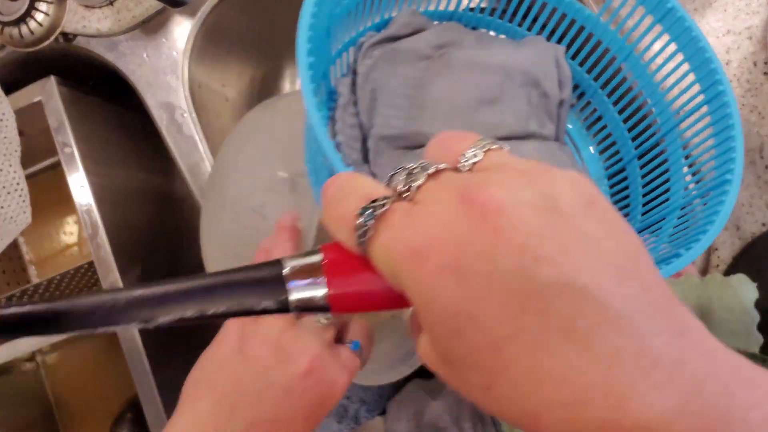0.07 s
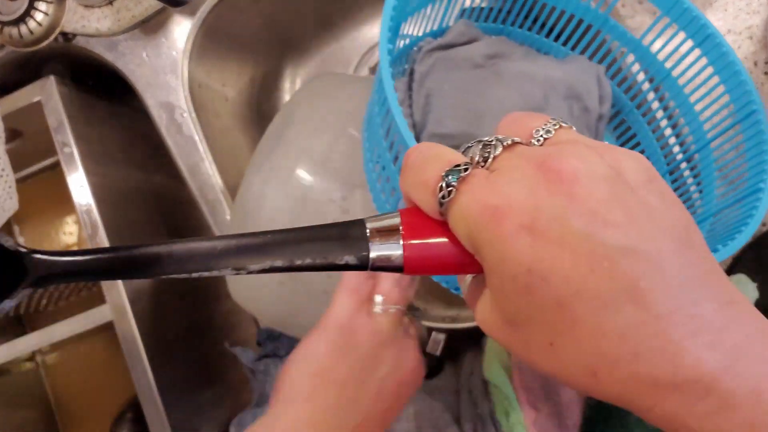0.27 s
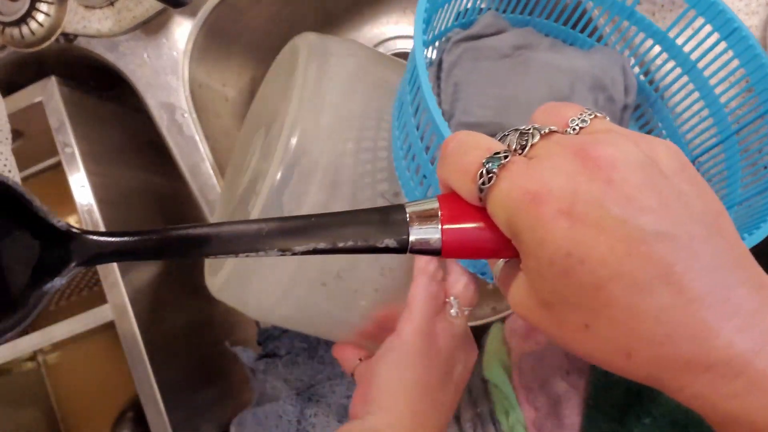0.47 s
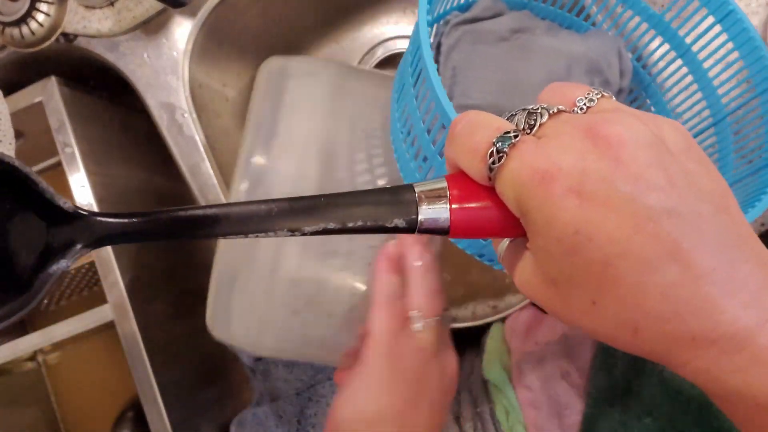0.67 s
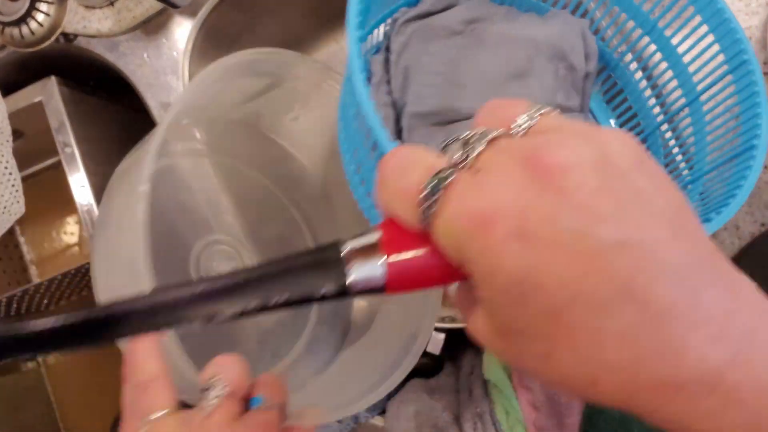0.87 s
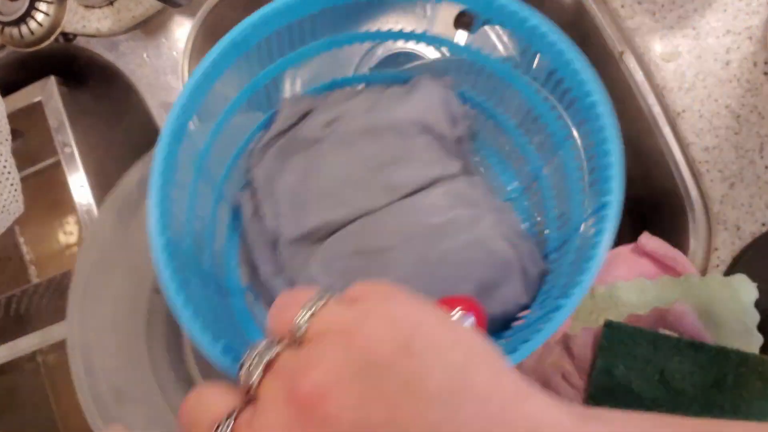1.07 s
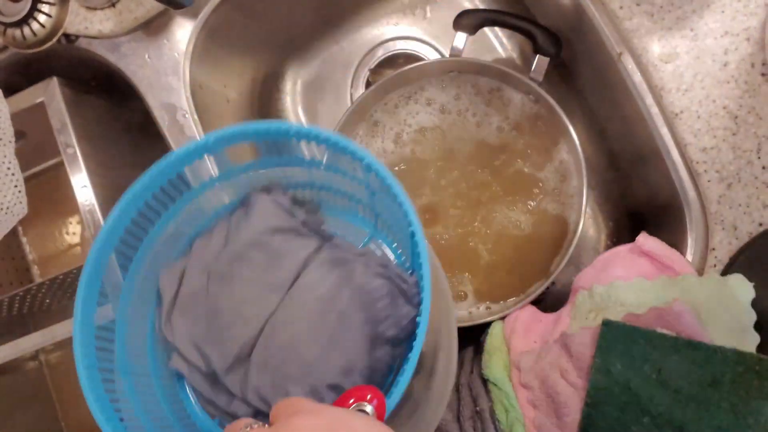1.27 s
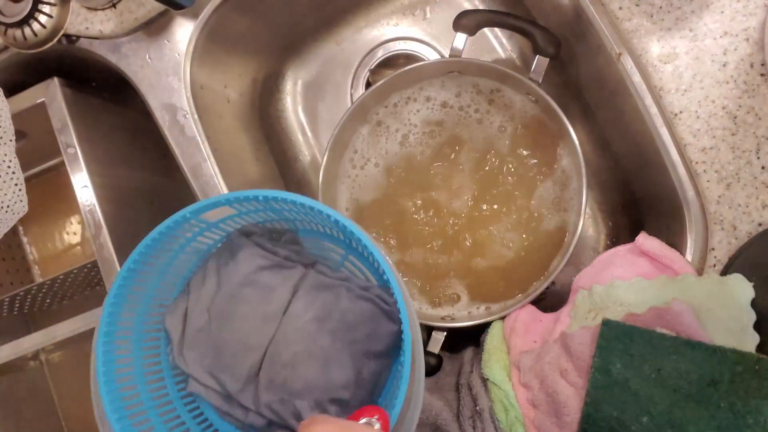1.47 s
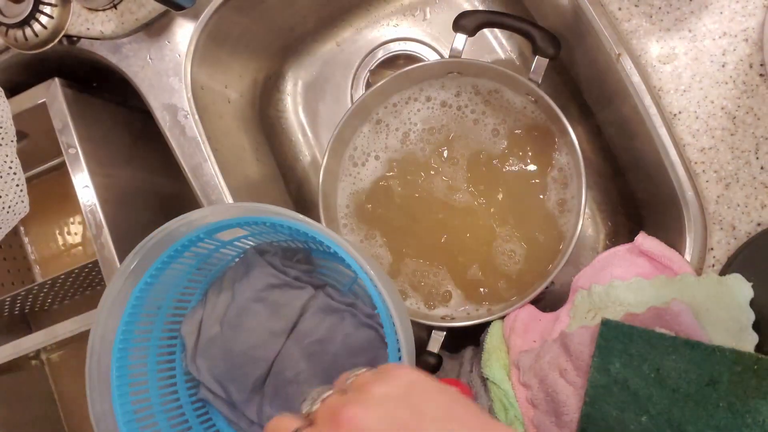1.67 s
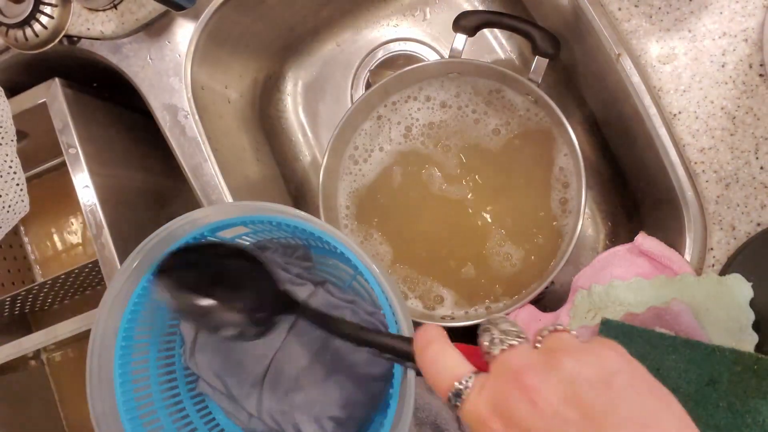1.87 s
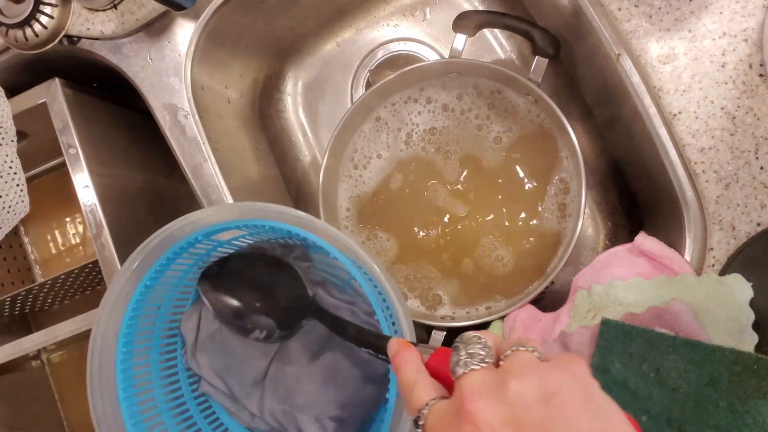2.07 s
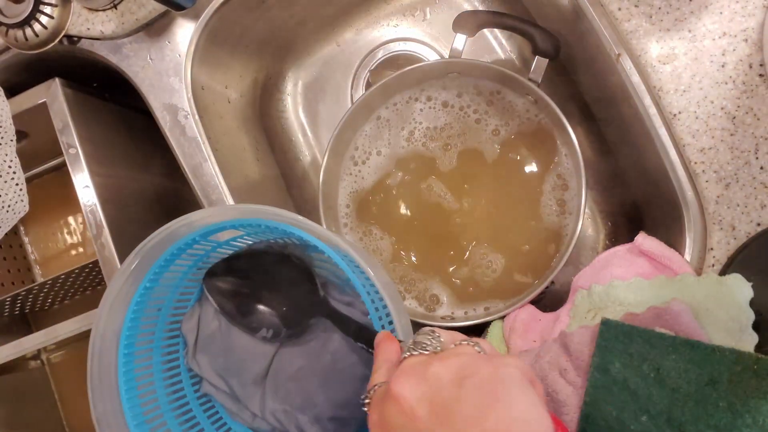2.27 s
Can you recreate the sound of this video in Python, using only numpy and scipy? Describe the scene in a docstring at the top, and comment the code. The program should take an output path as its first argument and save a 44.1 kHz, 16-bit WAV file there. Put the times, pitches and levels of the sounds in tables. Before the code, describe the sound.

Plastic basket knocks loudly into a plastic bowl in a steel sink, with wet scrapes and drips

```python
"""In a kitchen, a slotted plastic basket is lowered into a plastic bowl that stands in a steel sink.
Bowl and sink boom under each knock as sums of dying modes; rims click as noise bursts with short rings.
A few drops plop as gliding sines, a ladle taps, and wet rubbing scrapes, hisses and gurgles as shaped noise;
late on, the ladle presses wool. Echo tails and a low rumble surround it all.
A close pair of microphones clips on the loudest knocks."""
import sys
import numpy as np
from scipy import signal
from scipy.fft import rfft, irfft
from scipy.io import wavfile

SR = 44100
rng = np.random.default_rng(int(sys.argv[2]) if len(sys.argv) > 2 else 0)


def master(y):
    """Save y as 16-bit WAV."""
    cut = np.clip(np.atleast_2d(y).T, -1, 1)
    pcm = np.round(cut * 32767)  # scale
    wavfile.write(sys.argv[1], SR, pcm.astype(np.int16))


def boost_factor(decibels):
    """Convert a level in decibels to a linear amplitude factor."""
    exponent = np.asarray(decibels, float) / 20
    return 10 ** exponent


N = 101738  # samples in the scene

# Modes of the steel sink. Each row: frequency in Hz, level in dB, decay time t60 in seconds.
SINK_MODES = [(80.8, -12.5, 0.3), (108.02, -2, 0.61), (116.1, -3, 0.89), (156.6, 2, 0.32), (206.3, 2, 0.1)]
# Modes of the plastic bowl. Each row: frequency in Hz, level in dB, decay time t60 in seconds.
BOWL_MODES = [(230.94, -5.5, 0.39), (250, -8, 0.21), (297, -2.5, 0.11), (342, -22, 0.081),
              (376.7, -4, 0.21), (404.2, -1, 0.17), (504, -0.5, 0.15), (536.6, 1.5, 0.19), (591, -10, 0.17),
              (668, -12, .12)]
BOOM_PAN_DB, RUB_PAN_DB = -2, -4  # left over right, dB


def evened(x):
    """Normalisation: scales a signal to an rms of 1."""
    return x / np.sqrt(np.mean(x ** 2) + 1e-20)


def add(mix, s, sound):
    """Superposition: sums a sound into the mix from s seconds on."""
    part = mix[..., round(s * SR):][..., :sound.shape[-1]]
    part += sound[..., :part.shape[-1]]


def colour(x, points):
    """Spectral shaping: weights a signal's spectrum by a table of Hz and dB, then sets rms to 1."""
    f, db = np.transpose(points)
    hz = np.fft.rfftfreq(x.shape[-1], 1 / SR)
    gain = boost_factor(np.interp(np.log(hz + 1), np.log(f + 1), db, -90, -90))
    return evened(irfft(rfft(x) * gain, x.shape[-1]))


def filtered(x, kind, hz, order=2):
    """Butterworth filtering: a maximally flat pass band beyond or below a corner frequency."""
    return signal.sosfilt(signal.butter(order, hz, kind, fs=SR, output="sos"), x)


def pan(x, db):
    """Level panning: makes the left louder than the right by db."""
    return x * boost_factor(np.array([[db / 2], [-db / 2]]))


def pair(same, length=N):
    """Partial coherence: two white noises whose correlation is same."""
    a, b = rng.standard_normal((2, length))
    return np.array([a, same * a + np.sqrt(1 - same ** 2) * b])


def curves(table):
    """Envelopes: interpolates dB columns over time and turns them into gains."""
    s, *level = np.transpose(table)
    return [boost_factor(np.interp(np.arange(N) / SR, s, db)) for db in level]


def ring(modes, spot, favour_hz=None, damping=1, length_s=.5):
    """Modal synthesis: one object's dying sines, weighted by the struck spot, scaled to a peak of 1."""
    hz, db, t60 = np.transpose(modes)[:, :, None]
    t = np.arange(round(length_s * SR)) / SR
    if favour_hz:
        db = db - 12 * abs(np.log2(hz / favour_hz))  # dB lost per octave off the favoured pitch
    spot_db = 2.5 * spot[:len(modes), None]
    decay = boost_factor(db + spot_db - 60 * t * damping / t60)
    out = (decay * np.sin(2 * np.pi * hz * t)).sum(0)
    return out / abs(out).max()


def room_air():
    """Stationary background: steady coloured noise for the kitchen air, nearly mono low noise for rumble."""
    # Kitchen air. Each row: frequency in Hz, relative spectral density in dB.
    air_spectrum = [(200, -30.5), (400, -3), (600, 2), (1000, -24.5), (3000, -22), (8000, -25),
                    (15000, -25.5), (16500, -52)]
    # Low room rumble. Each row: frequency in Hz, relative spectral density in dB.
    rumble_spectrum = [(12, -44), (20, -20.5), (43, 5.5), (75, -3.5), (102, -7), (193, -8.5), (300, -11),
                       (390, -35.5), (660, -120)]
    air = boost_factor(-67.5) * colour(pair(.2), air_spectrum)
    rumble = boost_factor(-55) * colour(pair(.85), rumble_spectrum)
    return air + rumble


def gurgles():
    """Bubble resonance: many short decaying sines of rising pitch, scattered in pitch, time and side."""
    per_s, cycles, pitches = 180, 5.0, 14  # bubbles per second over all pitches; length of each in cycles
    out = np.zeros((2, N))
    for hz in np.geomspace(420, 4000, num=pitches):
        u = np.arange(0, 3 * cycles, hz / SR)  # time counted in cycles
        envelope = np.minimum(u, 1) * np.exp(-2 * u / cycles)
        blip = envelope * np.sin(2 * np.pi * u * (1 + 0.0056 * u))
        starts = rng.random(N) < per_s / pitches / SR
        strength = boost_factor(3.0 * np.minimum(rng.exponential(1, N), 3))
        out += pan(signal.oaconvolve(starts * strength, blip)[:N], rng.uniform(-13, 18))
    return evened(out)


def rubbing():
    """Wet friction: grains of noise scrape, hiss and gurgle; forced vibration keeps bowl and sink humming."""
    # Handling hum. Each row: time in seconds, level of the sink in dB, level of the bowl in dB.
    hum_levels = [(0.0, -24.5, -40), (0.31, -51, -45), (0.44, -39, -41.5), (0.54, -48.5, -53.5),
                  (0.72, -50, -48), (0.79, -34, -38), (0.92, -29.5, -48), (1.11, -40.5, -65.5),
                  (1.22, -38, -37), (1.35, -18, -36), (1.42, -20.5, -21), (1.51, -41.5, -31.5),
                  (1.63, -26.5, -30.5), (1.91, -39, -50.5), (2.16, -57, -57.5), (2.3, -70, -60.5)]
    # Wet rubbing and trickling. Each row: time in seconds, scrape level in dB, hiss level in dB.
    rub_levels = [(0, -48, -43.5), (.03, -49, -50.5), (.09, -53, -54), (.145, -60.5, -67),
                  (.16, -43.5, -53), (.21, -51, -62), (.275, -59.5, -63), (.29, -45, -64),
                  (.34, -45.5, -47), (.42, -45.5, -58), (.45, -35.5, -44), (.5, -46, -51),
                  (.57, -48.5, -49.5), (.63, -50.5, -56), (.66, -42.5, -49.5), (.74, -43.5, -51),
                  (.755, -35, -47), (.775, -33.5, -44), (.805, -44, -52), (.82, -46, -53),
                  (.86, -50.5, -67), (.95, -65, -65), (1.09, -65, -62), (1.115, -47, -61), (1.16, -53, -56),
                  (1.205, -40.5, -53.5), (1.3, -41, -40), (1.42, -39, -42.5), (1.47, -44.5, -54.5),
                  (1.54, -48, -56.5), (1.585, -32, -47), (1.62, -43.5, -51), (1.67, -44.5, -51.5),
                  (1.74, -46, -50), (1.82, -45.5, -60.5), (1.87, -55, -66.5), (2.0, -53.5, -68),
                  (2.12, -56.5, -67.5), (2.155, -51, -70), (2.175, -47, -52), (2.2, -52, -65.5),
                  (2.31, -56.5, -75)]
    # Colour of the scrape. Each row: frequency in Hz, relative spectral density in dB.
    scrape_spectrum = [(350, -18), (600, 0.5), (894, -14.5), (1010, -30.5), (1230, 5.5), (1580, -11),
                       (1930, 0), (4070, -7.5), (6500, -17.5), (8450, -36), (14300, -120)]
    # Its colour once the ladle presses the wool. Each row: frequency in Hz, relative density in dB.
    press_spectrum = [(240, -39.5), (400, -7), (523, -10), (1010, -14.5), (1550, -3.5), (2200, -12),
                      (2300, -14), (5030, -30), (6500, -26), (8450, -59), (14300, -120)]
    # Colour of the hiss. Each row: frequency in Hz, relative spectral density in dB.
    hiss_spectrum = [(2500, -38.5), (4500, -8.5), (7000, -8.5), (7900, -7.5), (8800, -4.5), (12000, -5),
                     (15500, -8), (16500, -29)]
    grits_per_s, smooth = 700, .8  # smooth: steady part of the noise gain beside the grains
    press_from_s, press_fade_s = 1.86, 0.11
    (sink, bowl), (scrape, hiss) = curves(hum_levels), curves(rub_levels)

    strength = boost_factor(3.0 * np.minimum(rng.exponential(1, N), 4))
    grains = (rng.random(N) < grits_per_s / SR) * strength
    roughness = evened(signal.lfilter([1], [1, -.99], grains))  # each grain dies away over a few ms
    grit = (smooth + roughness) * pair(.15)

    shake = filtered(rng.standard_normal(N), "low", 428, order=4)
    even_spot = np.zeros(15)
    sink_hum, bowl_hum = [evened(signal.oaconvolve(shake, ring(modes, even_spot))[:N])
                          for modes in (SINK_MODES, BOWL_MODES)]
    hum = sink * sink_hum + bowl * bowl_hum

    pressing = np.clip((np.arange(N) / SR - press_from_s) / press_fade_s, 0, 1)
    loose = colour(grit, scrape_spectrum) + gurgles()
    rub = (1 - pressing) * loose + pressing * colour(grit, press_spectrum)
    wet = scrape * rub + hiss * colour(grit, hiss_spectrum)
    return pan(hum, BOOM_PAN_DB) + pan(wet, RUB_PAN_DB)


def knocks():
    """Impact excitation: a short soft contact force sets the modes of bowl and sink ringing."""
    # Knocks on bowl and sink. Each row: start in seconds, bowl level in dB, sink level above the bowl
    # in dB, frequency favoured by the struck spot in Hz, factor on the bowl's damping.
    knock_rows = [(0.002, -13.5, -38, 223, 0.57), (0.155, -25.5, 5.5, 228, 0.44),
                  (0.31, -17, -30, 250, 0.43), (0.322, -16.5, -9, 238, 1.5), (0.454, -30, -6.5, 237, 0.43),
                  (0.747, -12.5, 1, 261, 0.77), (0.786, -7, 0.5, 198, 3.1), (0.803, -21, -17, 198, 0.82),
                  (1.104, -15, -6, 321, 1.4), (1.211, 11.5, -12.5, 366.4, 0.62),
                  (1.262, 5.5, -13, 385, 0.84), (1.28, -1.5, -30, 377, 0.74),
                  (1.327, 7.5, -14.5, 376, 1.45), (1.37, 5.5, -14, 349, 0.71), (1.387, 3, -6.5, 318, 2.8),
                  (1.42, -9.5, -17, 320, 1.6), (1.55, -11, -37, 310, 2.7), (1.593, -1.5, -22, 195, 3.9),
                  (1.681, -6, -18, 294, 3.4), (1.786, -12.5, -9, 314, 0.79), (1.801, -19.5, -20, 232, 1.36),
                  (1.93, -22, -9, 436, 1.7), (2.034, -25, -12, 248, 1.7)]
    contact_s, thump_t60 = 0.0023, 0.038  # seconds
    out, t = np.zeros(N), np.arange(SR // 2) / SR
    push = np.hanning(round(contact_s * SR))
    push /= push.sum()
    spots = rng.standard_normal((len(knock_rows), 30))
    for (s, db, sink_db, hz, damping), spot in zip(knock_rows, spots):
        thump = boost_factor(-60 * t / thump_t60) * np.sin(2 * np.pi * hz * t)  # dull push under the ring
        bowl = ring(BOWL_MODES, spot, hz, max(damping, .3)) + thump
        bowl = filtered(bowl, "high", 162.5)
        body = bowl + boost_factor(sink_db) * ring(SINK_MODES, spot[15:])
        add(out, s, boost_factor(db) * signal.oaconvolve(body, push))
    return pan(out, BOOM_PAN_DB)


def clicks():
    """Hard contact: a broadband crack, one short ring, the rim's modes and a treble snap with weaker spit."""
    # Clicks of the rims and of the ladle. Each row: start in seconds, level in dB, treble level above it
    # in dB, ring frequency in Hz, left over right in dB.
    click_rows = [(0.0074, -37.5, 4.5, 1240, -6.0), (0.1524, -31.5, -14.5, 2930, -7),
                  (0.243, -43, -15, 2860, -8), (0.2856, -30, -16, 1460, -11),
                  (0.3221, -25, -16, 1360, -2.5), (0.4351, -42.5, 0, 1160, -12),
                  (0.4455, -25, -11, 2390, -5), (0.5813, -28, -8.5, 1960, -3),
                  (0.617, -35, -24, 1250, -3.5), (0.7493, -18, -17, 1960, -9),
                  (0.7905, -16.5, -28, 1270, -2.5), (0.9207, -35.5, -17, 2680, -7),
                  (0.9607, -59, 8, 926, -6), (1.0056, -63, 8.5, 870, -8.0), (1.045, -50.5, -9, 2743, -11),
                  (1.0653, -45, -1.5, 3770, -13), (1.1051, -24, -22, 1740, -8.5),
                  (1.1615, -25.5, -27.5, 1870, -4), (1.2146, -6.5, -25.5, 1160, -2.5),
                  (1.2635, -7, -32.5, 1210, -4.0), (1.2817, -7.5, -32, 1140, -3),
                  (1.3268, -1, -21, 2000, -5.5), (1.3708, -2.5, -17, 1197, -6),
                  (1.3851, -3.5, -17.5, 1920, -3.5), (1.493, -25, -33.5, 1730, -1.5),
                  (1.5488, -17.5, -25.5, 1060, -4.5), (1.5939, -17.5, -12, 1290, -3),
                  (1.6798, -17.5, -27.5, 1230, -4.5), (1.7863, -24, -32, 1210, -3.5),
                  (1.8028, -23, -12.5, 1480, -7), (1.9305, -19.5, -28.5, 1210, -4.5),
                  (2.0319, -29.5, -27, 1890, -3.5), (2.168, -41, -8, 1740, -7.5)]
    # Modes of a plastic rim. Each row: frequency in Hz, level in dB, decay time t60 in seconds.
    rim_modes = [(1128, 0.5, 0.028), (1210, 3, 0.043), (1460, -16, .05), (1680, -16, 0.058),
                 (1797, 5, 0.068), (2038, 8, 0.037), (2146, -13, .04), (2600, -3, .05),
                 (2600, -15.5, 0.065), (3480, 1.5, 0.047), (4120, -11, .03)]
    # Colour of the crack. Each row: frequency in Hz, relative spectral density in dB.
    crack_spectrum = [(400, -40), (800, -11.5), (1200, -4.5), (2200, -2), (3200, -2), (4800, -17),
                      (6500, -17.5), (9000, -54)]
    # Colour of the treble. Each row: frequency in Hz, relative spectral density in dB.
    treble_spectrum = [(2500, -38), (4500, 2.5), (6500, -5), (9000, -0.5), (12500, -4.5), (15500, -5),
                       (16500, -24)]
    crack_t60, ring_t60, snap_t60, spit_t60 = 0.032, 0.02, 0.0084, 0.053  # seconds
    lag_s = .0002  # largest left-right arrival gap
    out, t = np.zeros((2, N)), np.arange(SR // 5) / SR
    spots = rng.standard_normal((len(click_rows), 15))
    for (s, db, treble_db, hz, pan_db), spot in zip(click_rows, spots):
        crack = boost_factor(-60 * t / crack_t60) * colour(rng.standard_normal(len(t)), crack_spectrum) / 2
        rim = boost_factor(-1.5) * ring(rim_modes, spot, length_s=.2)
        tone = boost_factor(-0.5 - 60 * t / ring_t60) * np.sin(2 * np.pi * hz * t)
        onset = np.minimum(t / 0.00051, 1)
        left, right = pan(boost_factor(db) * (crack + rim + tone) * onset, pan_db)
        add(out[0], s, left)
        add(out[1], s + lag_s * np.tanh(spot[-1]), right)

        treble = colour(pair(0.1, len(t)), treble_spectrum) * np.minimum(t / 0.00072, 1)
        treble *= boost_factor(5.5 - 60 * t / snap_t60) + boost_factor(1 - 60 * t / spit_t60)  # snap, then spit
        add(out, s, pan(boost_factor(db + treble_db) * treble, pan_db / 2))
    return out


def drops():
    """Bubble resonance: each drop leaves a bubble, a decaying sine whose pitch glides."""
    # Drops. Each row: start in seconds, level in dB, starting frequency in Hz, decay time t60 in seconds,
    # half the relative change of frequency per second.
    drop_rows = [(.403, -26.5, 924, 0.066, -5), (.412, -26, 714, 0.066, 4), (.43, -34, 850, 0.028, -3),
                 (.455, -21, 475, 0.036, 6), (.485, -31, 587, 0.071, 4.5), (.522, -29, 820, 0.057, 4.5),
                 (0.657, -28, 1235, 0.1, -0.6), (.685, -35, 764, 0.15, 0), (.71, -25, 300, 0.045, -6)]
    out, t = np.zeros(N), np.arange(SR // 5) / SR
    for s, db, hz, t60, glide in drop_rows:
        envelope = boost_factor(db - 60 * t / t60) * np.minimum(t / 0.0027, 1)
        add(out, s, envelope * np.sin(2 * np.pi * hz * t * (1 + glide * t)))
    return pan(out, RUB_PAN_DB)


def kitchen(x):
    """Diffuse reverberation: dying noise tails of sink walls and room, unlike per ear, three in rotation."""
    # Decay of the echoes. Each row: frequency in Hz, decay time t60 in seconds.
    tail_decay = [(100, 0.6), (700, 0.26), (2000, 0.21), (5000, 0.1), (13000, 0.12)]
    f, t60 = np.transpose(tail_decay)
    out, turn = np.zeros((2, N)), np.arange(N) / SR * 9
    for k in range(3):
        taps = rng.standard_normal((2, SR // 2)) * (np.arange(SR // 2) > 40)  # short gap before the tail
        hz, t, z = signal.stft(taps, SR, nperseg=256)
        band_t60 = np.interp(np.log(hz + 1), np.log(f), t60)[:, None]
        tail = signal.istft(z * boost_factor(-60 * t / band_t60), SR, nperseg=256)[1]
        tail /= np.linalg.norm(tail[0])
        share = np.sqrt(2 / 3) * np.cos(np.pi * (turn + k / 3))  # the squared shares sum to 1
        out += signal.fftconvolve(x * share, tail, axes=1)[:, :N]
    return out


def scene():
    """Superposition: direct sounds, their echoes and the room's background add linearly."""
    background, rubs = room_air(), rubbing()
    boom, sharp = knocks(), clicks() + drops()
    echoes = kitchen(boost_factor(-7) * sharp + boost_factor(-18.5) * boom)
    return boom + sharp + echoes + rubs + background


def band_limit(x):
    """A steep low-pass at the top of the band."""
    return signal.sosfilt(signal.butter(12, 16700, fs=SR, output="sos"), x)


def record(dry):
    """Microphone overload: the bass rolls off below 53 Hz, then peaks are clipped hard at full scale."""
    cut = filtered(dry, "high", 53)
    clipped = np.clip(cut, -1, 1)
    return band_limit(clipped)


dry = scene()
out = record(dry)
master(out)
```